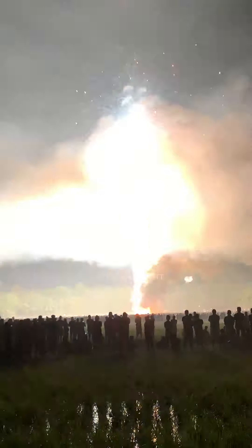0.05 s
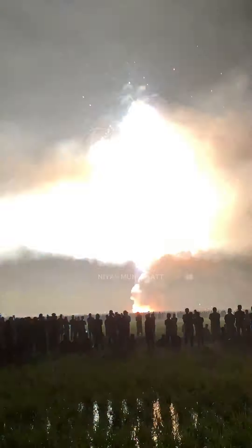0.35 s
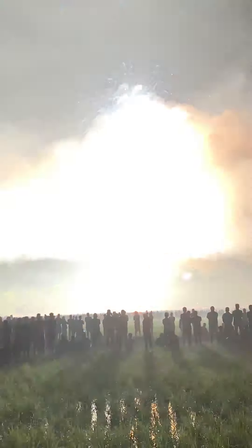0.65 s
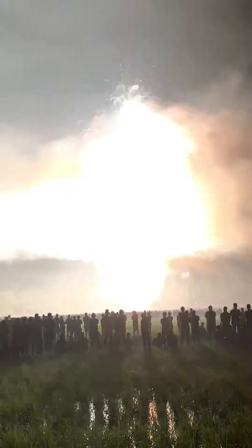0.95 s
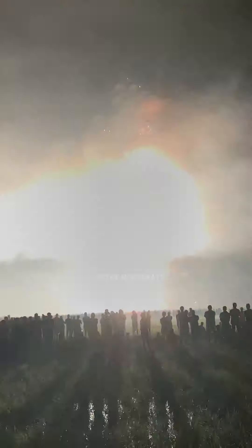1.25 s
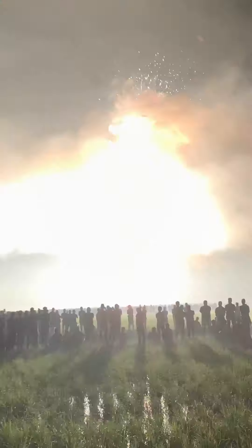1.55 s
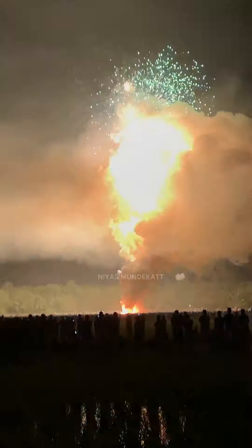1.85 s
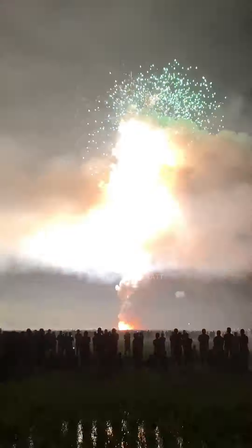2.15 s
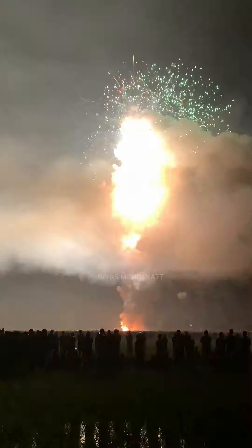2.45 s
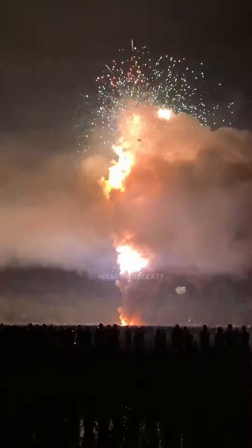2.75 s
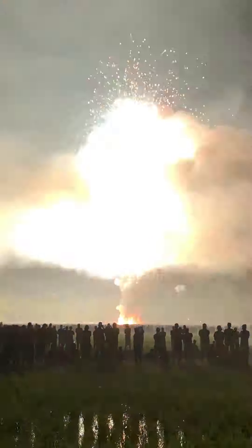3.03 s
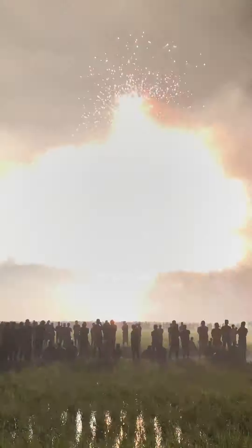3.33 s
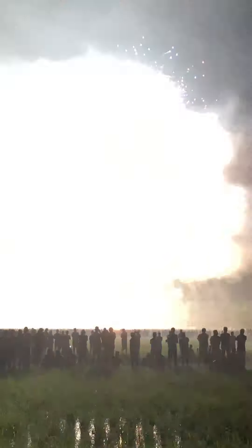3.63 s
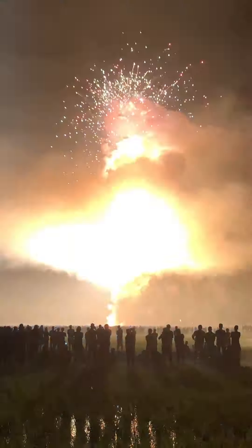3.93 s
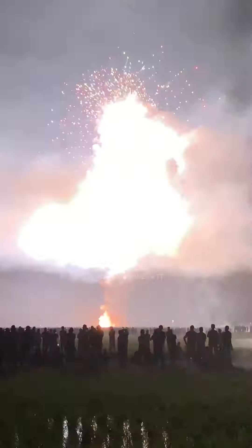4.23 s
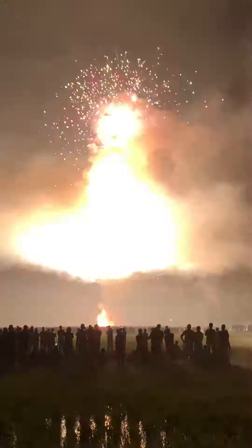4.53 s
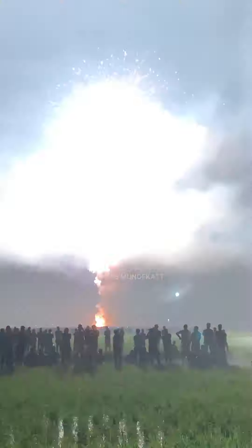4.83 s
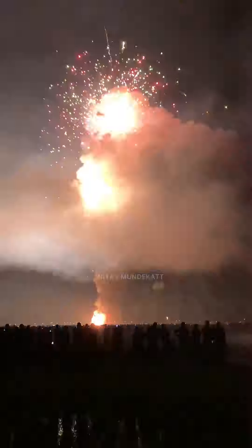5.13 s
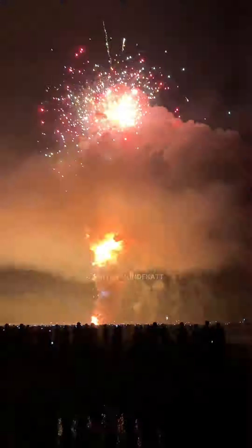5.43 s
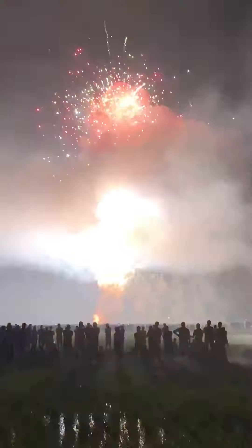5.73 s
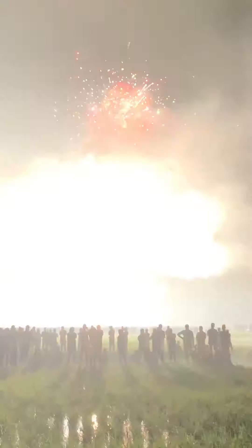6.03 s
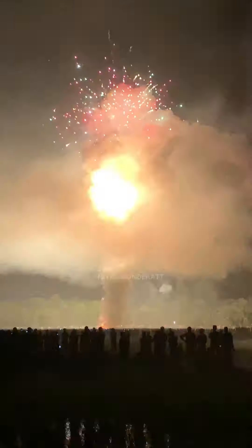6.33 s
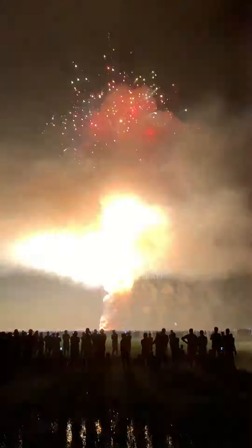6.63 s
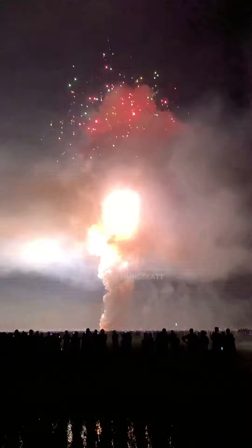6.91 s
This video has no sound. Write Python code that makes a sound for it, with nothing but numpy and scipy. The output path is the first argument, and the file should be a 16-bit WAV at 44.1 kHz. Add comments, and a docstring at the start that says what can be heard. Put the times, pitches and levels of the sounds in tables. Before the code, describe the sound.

A firecracker barrage goes off across an open field at night. Small crackers burst so quickly that they merge into a crackling rumble, while louder shells punch through with sharp cracks and deep thumps. Toward the end the small crackers burn out, leaving separate bangs, a few with a hollow knock. The microphone stands at a distance, and each blast trails dull echoes and a long, wide roll.

```python
"""A wet field at night, with the finale of a firecracker barrage heard from across it. Small crackers
burst so fast that they merge into a rumble, then burn out and leave single shells, each trailed by
lesser charges. A burst is a sharp crack plus a thump that sweeps downward, as the low notes travel late
over the soft ground. The field scatters the sound into a long roll and sends back two dull echoes.
A few of the late shells also ring with a hollow knock."""
import sys
import numpy as np
from scipy import signal
from scipy.fft import rfft, irfft, next_fast_len
from scipy.io import wavfile
from scipy.ndimage import uniform_filter1d, minimum_filter1d

SR = 44100
rng = np.random.default_rng(int(sys.argv[2]) if len(sys.argv) > 2 else 0)


def persist_wave(psi):
    """Save psi, clipped to +-1, as 16-bit WAV."""
    counts = np.round(np.clip(psi, -1, 1) * 32767).astype(np.int16)
    wavfile.write(sys.argv[1], SR, np.atleast_2d(counts).T)


N = 311787
BURST_SIZE, PADDED = 8192, next_fast_len(2 * N)  # samples of working room: one burst, the whole scene
FREQ = np.maximum(np.arange(PADDED // 2 + 1) * SR / PADDED, 1)

# the shells that stand out, some after a pause in the small crackers:
# (time [s], relative thump level [dB], relative crack level [dB], pause before it [s])
SHELLS = [(0.02, 2, -8, 0.0017), (.078, -10, -15, 0.05), (0.124, 1.5, 0, 0), (.137, 0, 6, 0),
          (0.149, -4, 3, 0), (0.168, 0, 6, 0), (.231, 4.5, 1.5, .0049), (.306, -1, 5.5, 0.013),
          (.336, 3, 4, .014), (.361, -4, -0.5, 0.0091), (.39, 6, 7, 0.021), (.432, -2, 5, 0.0098),
          (.496, -6, 5.5, 0.012), (.532, 1, -5, 0.02), (.601, -7, -10, 0.018), (.669, 4, 0, .018),
          (.734, 1, 4, 0), (.76, 5, 7.5, 0), (.858, 3.5, 2, 0), (.887, 3.5, 6, .004),
          (.934, 3.5, 0, 0.0077), (0.994, -3, -6, 0.006), (1.004, -0.5, 1, 0), (1.081, 4.5, -3, 0.041),
          (1.151, 2.5, 6, 0.011), (1.173, -2, 6.5, .008), (1.189, 3, 0, 0.0027), (1.212, -3, 2, 0),
          (1.286, -6, -9, 0.024), (1.363, 4, 2, 0.0035), (1.461, 2, -2, 0), (1.52, 4, 6, 0),
          (1.614, -6, -3, .043), (1.628, -4, -8, 0.016), (1.671, -0.5, -2, 0.029), (1.691, 4, -6, 0.0042),
          (1.705, 3, 0, 0.00044), (1.768, 7, 5, 0), (1.819, -5, 2, 0), (1.847, 2.5, 4, 0.0033),
          (1.863, 5.5, 5, 0), (1.906, 4, 1, 0.0074), (1.955, -4, -1, 0.011), (1.982, -1, 4, 0.0095),
          (2.053, -2.5, -9, 0), (2.074, -9, 1, .039), (2.11, -2, -3, .03), (2.139, 2, 3, 0.0069),
          (2.176, 1, 2, 0), (2.229, -3, 3, 0.0042), (2.243, -15, 3, 0.0043), (2.294, 1.5, -6, 0.02),
          (2.324, -7, -3, 0.018), (2.339, 2, -1, 0.0066), (2.446, 4.5, 3.5, 0), (2.525, 4.5, -1, 0),
          (2.601, 1, 0, 0.0054), (2.67, 2.5, 2, 0.057), (2.741, 2, -1, 0), (2.777, -2, 1, 0.016),
          (2.8, 3, 2, 0.0015), (2.873, 3, 2, .004), (2.888, 5, 6, 0.0019), (2.943, 2.5, -14, 0.022),
          (2.995, -2, 3.5, .008), (3.033, 4, -4, 0.011), (3.082, 0, -7, 0), (3.157, 0, 1.5, 0.01),
          (3.199, 2.5, 1.5, 0.013), (3.232, 0, 4.5, 0), (3.267, 7.5, 6, 0.0048), (3.387, -4, 1, 0.0072),
          (3.413, -5, -7, 0.027), (3.453, 3.5, 3.5, 0.012), (3.481, 2, -1, 0), (3.526, -11, 1, 0.026),
          (3.586, 3.5, 6, 0.00096), (3.608, 2.5, 5.5, 0), (3.694, 2.5, -11, 0.033), (3.816, -1, 4, 0.011),
          (3.85, 0.5, 2, 0.044), (3.893, 1, 5, 0), (3.915, 2.5, 5, 0), (3.966, 2.5, -1, 0.00059),
          (3.998, -5, -5, 0.027), (4.08, 1, -1, 0.036), (4.101, -5, -7, 0.05), (4.13, -1, 3, 0),
          (4.153, 2, 3, 0.0013), (4.187, -2, 0.5, 0.001), (4.213, -5, -5, 0.017), (4.243, 3.5, 5, 0.02),
          (4.27, 0, 2, 0), (4.344, -3.5, -13, .057), (4.375, -9, -4.5, 0.024), (4.43, 3.5, 1, 0.044),
          (4.479, 5, 5, 0), (4.509, 0, -4, 0.004), (4.549, 3.5, -6, 0), (4.574, 1.5, 5.5, .008),
          (4.672, 2, -1.5, 0.036), (4.687, 0, 1.5, 0), (4.708, 1, 6.5, 0.0028), (4.727, 4, 6.5, 0),
          (4.748, 0.5, 3, 0), (4.802, 2, 1, .02), (4.81, -2, 0, 0.012), (4.841, -3, 5, 0.00016),
          (4.909, -2, 0.5, 0.000042), (4.928, 4, 3.5, 0.0057), (4.969, -6.5, 3.5, 0.01),
          (4.993, -5, -7, 0.0054), (5.034, -7.5, 3.5, 0.039), (5.096, 3.5, 5, 0.056),
          (5.104, 1.5, -7, 0.02), (5.141, 4, 2, 0.021), (5.163, 2, 0, 0), (5.183, 1, 2.5, 0),
          (5.221, -16, -5, 0.032), (5.238, -6.5, -4, 0.0074), (5.263, -2.5, 1, .019), (5.288, 1, -5, 0.015),
          (5.311, -3, 0, 0), (5.337, 0, 0, 0.025), (5.353, -1, 1.5, .005), (5.385, -4.5, 5, 0.047),
          (5.452, -2.5, 0, 0.069), (5.492, -1.5, -2.5, .04), (5.531, 3, 1, .036), (5.555, -5, 5, 0.0013),
          (5.589, 0.5, 4, .013), (5.61, 1, 2, .0082), (5.694, -2, -3, 0.12), (5.724, 1.5, -10, 0),
          (5.742, -5, 5, 0.0083), (5.752, -4, 1.5, 0.013), (5.776, 3, 3.5, 0.042), (5.824, 0, 2.5, 0.02),
          (5.849, -8, -0.5, 0.0097), (5.866, -13, -13, 0.011), (5.917, -5, 2.5, 0.013),
          (5.964, 2, 1.5, 0.084), (5.993, 6, 4.5, .03), (6.007, -6, 2, .012), (6.037, 4, 6.5, 0),
          (6.049, -4, 1, 0.011), (6.083, 3, 1, 0), (6.1, 0, 2, 0.0019), (6.15, -1, 2, 0.0045),
          (6.274, -3, 0.5, .02), (6.297, 2.5, 2.5, .007), (6.367, 2.5, 2.5, .016), (6.393, 1, 2, 0),
          (6.459, -8, 4, .007), (6.465, 0, -4, 0.0089), (6.527, 0.5, -1, 0.0065), (6.857, 6, 6, 0),
          (6.892, 0, 3.5, 0)]
# the small crackers as the pile burns out: (time [s], relative level of each [dB], pace [bursts/s])
BARRAGE = [(0, -25.5, 192), (.14, -22.5, 173), (.56, -29, 176), (.749, -24.5, 180), (1.05, -28.5, 180.5),
           (1.5, -23.5, 181.5), (2.03, -26.5, 178), (2.2, -24, 182.4), (3.3, -25.5, 181.6),
           (3.9, -26.5, 187), (4.35, -25.5, 140), (4.72, -29.5, 141), (5.0, -29, 95.4), (5.5, -29.5, 61),
           (6.05, -27, 70), (6.199, -38, 21)]
# the tone of one burst from this far away: (frequency [Hz], relative level [dB])
BURST_TONE = [(25, -38.5), (45, -7), (70, 3.5), (115, 1.5), (170, -5), (225, -11.5), (300, -10), (355, -17),
              (410, -12.5), (450, -18.5), (490, -10.5), (660, -15), (770, -23.5), (960, -24), (1130, -23),
              (1350, -26), (2000, -30), (7000, -40.5), (14000, -49)]


def undb(db):
    """Turn decibels into a gain to multiply by."""
    return 10 ** (np.asarray(db) / 20)


def over_hz(table):
    """Join (frequency, value) rows into a smooth curve over all frequencies."""
    hz, values = np.array(table, float).T
    return np.interp(np.log(FREQ), np.log(hz), values)


def shape(x, gain):
    """Filter a sound with one gain for each frequency."""
    return irfft(rfft(x, PADDED) * gain, PADDED)[..., :N]


def causal(gain):
    """Keep these gains, but make the filter ring only after a blow, never before it."""
    cepstrum = irfft(np.log(gain), PADDED)
    return np.exp(rfft(2 * cepstrum[:PADDED // 2], PADDED) - cepstrum[0])


def delay(hz, seconds):
    """The filter that makes a sound arrive later."""
    return np.exp(-2j * np.pi * hz * seconds)


def unit(x):
    """Scale each row to an energy of 1."""
    return x / np.sqrt(np.sum(x ** 2, axis=-1, keepdims=True))


def waver(rate):
    """A random curve around zero that takes a new value `rate` times a second."""
    return np.interp(np.arange(N) / SR * rate, np.arange(N), rng.standard_normal(N))


def place(times, sounds):
    """Lay one sound at each time."""
    out = np.zeros(N + BURST_SIZE)
    for start, sound in zip(np.clip(times * SR, 0, N - 1).astype(int), sounds):
        out[start:start + len(sound)] += sound
    return out[:N]


def thumps(times, db, size_spread, boom_db, bounce, pop_db, boom_hz=120, pop_hz=290, pop_width=0.095,
           lag_s=0.010766, lag_hz=100, bend=0.412, top_hz=1500, bounce_s=0.00705):
    """Pressure waves spread by the ground: lower notes arrive later, and big charges swing slower."""
    charge, height = rng.random((len(times), 2)).T[..., None]
    size = np.exp(size_spread * (2 * charge - 1))
    hz = np.maximum(np.arange(BURST_SIZE // 2 + 1) * SR / BURST_SIZE, 10)
    sweep_cycles = lag_s * lag_hz / bend * (lag_hz / (hz * size)) ** bend - 0.26
    # heavy charges boom in the bass, light ones pop higher up
    bass = 1 / (1 + (hz / boom_hz) ** 4)
    pop = np.exp(-(np.log(hz * size / pop_hz) / pop_width) ** 2)
    tone = undb(boom_db * bass + pop_db * pop) / np.sqrt(1 + (hz / top_hz) ** 2)
    # a second path, its length set by the height of the burst, gives each one its own hollow knock
    hollow = 1 + bounce * (1 - bass) * delay(hz, height * bounce_s)
    waves = irfft(tone * hollow * np.exp(2j * np.pi * sweep_cycles))[:, :BURST_SIZE // 2]
    return place(times, waves * undb(db)[:, None])


def ground_bounce(hz, strength, typical_s, stretch):
    """The filter that adds a slightly late copy off the ground, making a crack sound hollow."""
    late_s = np.round(SR * typical_s * np.exp(stretch)) / SR
    return 1 + strength * delay(hz, late_s)


def cracks(times, db, ragged_db, low_hz, grit_db=5, snap_s=.0062, spray_s=.045, spray_db=-6,
           dull_hz=6000, bright_db=2, bright_hz=5000):
    """A clean shock, duller ragged spikes and a faint spray, all doubled by two ground bounces."""
    t = np.arange(BURST_SIZE // 2) / SR
    hz = np.fft.rfftfreq(len(t), 1 / SR)
    noise, grit, chance = rng.standard_normal((len(times), 3, len(t))).swapaxes(0, 1)
    height, sharpness, angle = chance[:, :3].T[..., None]
    sudden_end = np.exp(-(t / snap_s) ** 4)
    spikes = undb(ragged_db) * unit(noise * undb(grit_db * grit) * sudden_end)
    spray = undb(spray_db) * unit(grit * np.exp(-t / spray_s))
    shock = 1 + rfft(spikes + spray) / (1 + 1j * hz / dull_hz)  # the 1 is a perfectly clean click
    bounce = ground_bounce(hz, strength=0.93, typical_s=.0021, stretch=.3 * height)
    graze = ground_bounce(hz, strength=0.64, typical_s=.0006, stretch=.5 * angle)
    brightness = 1 + (undb(bright_db * sharpness) - 1) * 1j * hz / (bright_hz + 1j * hz)
    snaps = irfft(shock * bounce * graze * brightness) * (1 - t / t[-1])
    bass_cut = signal.butter(2, low_hz, "high", fs=SR, output="sos")
    return signal.sosfilt(bass_cut, place(times, undb(db)[:, None] * unit(snaps)))


def small_crackers(thump_db=20, crack_db=24.5, spread_db=4.5, pause_db=-13,
                   light_db=-5, heavy_db=6.5, heavy_share=0.208, chances=1800):
    """Strings of small crackers go off at random, ever fewer as the pile burns out."""
    when, level_db, pace = np.transpose(BARRAGE)
    jitter, luck, strength, charge = rng.random((chances, 4)).T
    slot_s = when[-1] / chances
    times = (np.arange(chances) + 2 * jitter - 1) * slot_s
    db = np.interp(times, when, level_db) + spread_db * (2 * strength - 1)
    for shell_time, _, _, pause_s in SHELLS:  # they turn quieter in each pause, and a shell ends it
        db += pause_db * ((times < shell_time) & (times > shell_time - pause_s))
    fires = luck < np.interp(times, when, pace) * slot_s
    times, db = times[fires], db[fires]
    # all of them knock and crack, but only the few heavy ones boom
    boom_db = np.where(charge[fires] < heavy_share, heavy_db, light_db)[:, None]
    body = thumps(times, db + thump_db, size_spread=0.2, boom_db=boom_db, bounce=0.96, pop_db=5)
    return body + cracks(times, db + crack_db, ragged_db=-1.5, low_hz=960)


def big_shells():
    """The loud bursts, each with its own weight of thump and sharpness of crack."""
    times, thump_db, crack_db, _ = np.array(SHELLS, float).T
    body = thumps(times, thump_db, size_spread=0.075, boom_db=2.5, bounce=0.41, pop_db=-14.5,
                  boom_hz=89, lag_s=0.011385)
    return body + cracks(times, crack_db - 0.5, ragged_db=2.5, low_hz=780)


def trailing_charges(per_shell=2, within_s=.016, trail_db=-9):
    """Each shell sets off lesser charges just after it, weaker as the pile burns out."""
    when, _, pace = np.transpose(BARRAGE)
    times, thump_db, crack_db, _ = np.repeat(np.array(SHELLS, float), per_shell, axis=0).T
    times = times + within_s * rng.random(len(times))
    weaker_db = trail_db + 10 * np.log10(np.interp(times, when, pace) / pace.max())
    body = thumps(times, thump_db + weaker_db, size_spread=0.2, boom_db=-4.5, bounce=1, pop_db=6)
    return body + cracks(times, crack_db + weaker_db - 1, ragged_db=-6, low_hz=1000)


def field_roll(bursts, near_s=0.013, build_s=0.0024, patchy_db=2, patchy_rate=30, wide_hz=300):
    """Each burst goes off somewhere else and scatters as fresh noise: a near spray, then a long roll."""
    # the sound that the field scatters:
    # (frequency [Hz], near spray level [dB], far roll level [dB], time for the roll to fade 60 dB [s])
    scatter = [(58.6, -35, -10, 4.4), (144, -36, -11.5, 4.6), (296, -12, -8.5, 4.7), (574, -9.5, -14, 4.8),
               (1060, -8, -9.5, 2.7), (2430, -2, -11, 3.17), (4870, -6.5, -16.5, 3),
               (8900, -37, -10.5, 0.73), (14104, -41, -35, 1.0)]
    t = np.arange(N) / SR
    noise, sound = rfft(rng.standard_normal((2, N)), PADDED), rfft(bursts, PADDED)
    centres = np.log([row[0] for row in scatter])
    tone = undb(over_hz(BURST_TONE))
    roll = 0
    for this_band, (_, near_db, far_db, fade_s) in zip(np.eye(len(scatter)), scatter):
        band = np.sqrt(np.interp(np.log(FREQ), centres, this_band))
        near = undb(near_db) * unit(np.exp(-t / near_s))
        far = undb(far_db) * unit(undb(-60 * t / fade_s) * (1 - np.exp(-t / build_s)))
        burst_power = irfft(sound * band, PADDED)[:N] ** 2
        lingering_power = signal.fftconvolve(burst_power, near ** 2 + far ** 2)[:N]
        hiss = irfft(noise * band * tone, PADDED)[:, :N] * undb(patchy_db * waver(patchy_rate))
        roll = roll + np.sqrt(np.abs(lingering_power)) * hiss / hiss.std()
    mid, side = roll
    side = shape(side, FREQ / (FREQ + wide_hz))  # wide from left to right, except in the bass
    return np.array([mid + side, mid - side]) / np.sqrt(2)


def far_echo(bursts, delay_s, echo_db, top_hz):
    """An edge of the field returns the bursts, dulled to a thump or a faint rattle."""
    return shape(bursts, undb(echo_db) * delay(FREQ, delay_s) / (1 + (FREQ / top_hz) ** 4))


def hollow_knocks():
    """A few of the late shells also ring with a hollow knock."""
    # the knock of each of these shells: (time [s], relative level [dB])
    knocks = [(4.841, -9), (5.168, -11), (5.311, -10), (5.354, -6), (5.745, -9), (5.826, -11), (5.964, -9)]
    times, db = np.array(knocks, float).T
    return thumps(times, db, size_spread=.08, boom_db=-12, bounce=.3, pop_db=12,
                  pop_hz=305, pop_width=.17)


def from_one_side(sound):
    """Sound from one side reaches the two microphone openings with unequal timing and strength."""
    # how far the left wave runs ahead of the right: (frequency [Hz], lead [radians])
    left_lead = [(0, 0), (600, -1.45), (860, -2.3), (1380, -2.7), (1980, -6.5), (2580, -3.7), (3880, -4.6),
                 (5080, -2.8), (6370, -0.5), (7490, 0.2), (9040, 2.7), (10200, 3.4), (11800, 6.1),
                 (13000, 6.4), (13900, 8.4)]
    # how much louder the left is: (frequency [Hz], left minus right [dB])
    left_balance = [(60, 1.5), (110, 1), (200, 0), (370, -1.4), (670, -0.5), (1220, -3.5), (2240, -5.5),
                    (4090, -1), (7470, 0.3), (13700, -0.5)]
    lead = np.interp(FREQ, *np.transpose(left_lead))
    tilt = undb(over_hz(left_balance) / 2)
    return shape(sound, np.array([tilt * np.exp(1j * lead), 1 / tilt]))


def scene(boost_db=34):
    """The bursts and their two echoes come from one side, while the roll spreads wide."""
    charges = big_shells() + hollow_knocks() + trailing_charges() + small_crackers()
    bursts = shape(charges, causal(undb(boost_db + over_hz(BURST_TONE))))
    thump_echo = far_echo(bursts, delay_s=.1365, echo_db=-7.5, top_hz=200)
    rattle_echo = far_echo(bursts, delay_s=.243, echo_db=-16.5, top_hz=1800)
    return from_one_side(bursts + thump_echo + rattle_echo) + field_roll(bursts)


def record(dry, ceiling=0.96, limit_db=-3, hold_s=0.0094, top_hz=14700):
    """The phone briefly turns down the loudest bursts, rounds off peaks and cuts the highest treble."""
    hold = int(hold_s * SR)
    allowed_gain = 1 / np.maximum(np.abs(dry).max(axis=0) / undb(limit_db), 1)
    smooth_gain = uniform_filter1d(minimum_filter1d(allowed_gain, hold), hold)
    held = dry * np.sqrt(smooth_gain)
    rounded = held / (1 + (held / ceiling) ** 4) ** (1 / 4)
    treble_cut = signal.ellip(10, .2, 80, top_hz, fs=SR, output="sos")
    return signal.sosfilt(treble_cut, rounded)


dry = scene()
out = record(dry)
persist_wave(out)
```